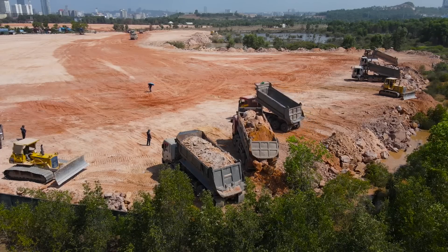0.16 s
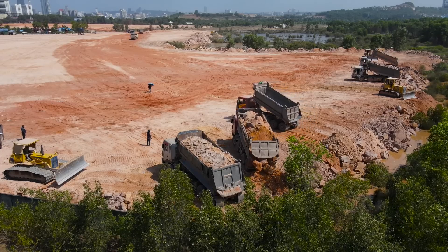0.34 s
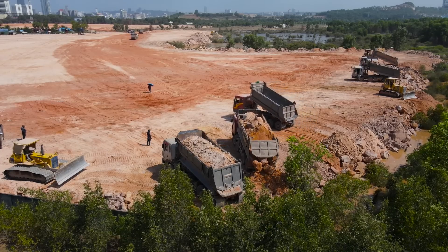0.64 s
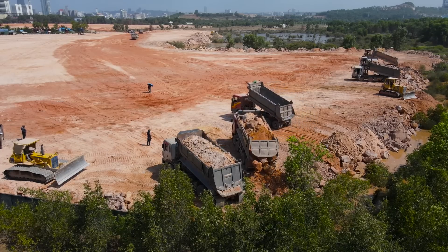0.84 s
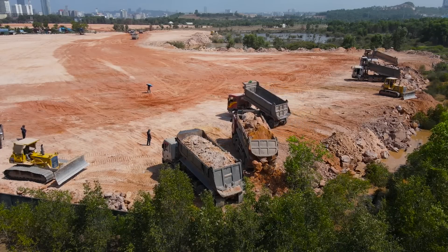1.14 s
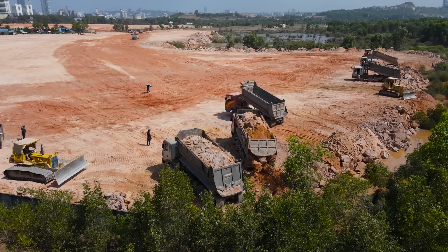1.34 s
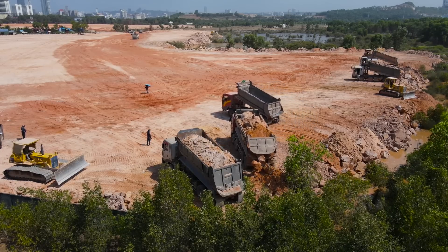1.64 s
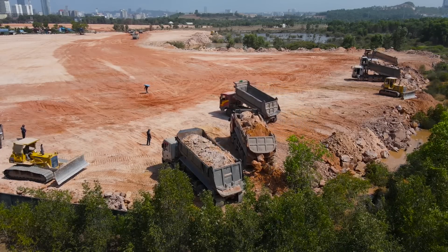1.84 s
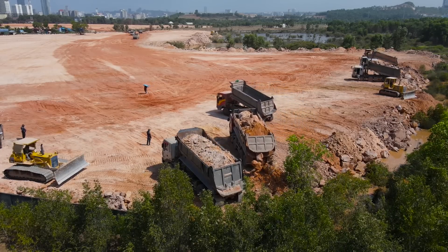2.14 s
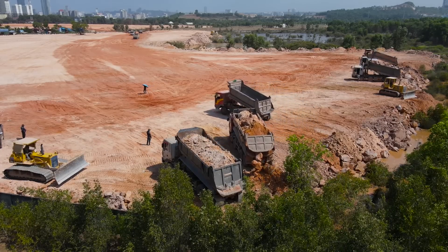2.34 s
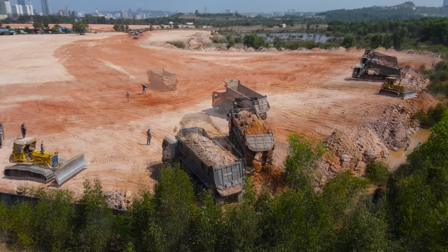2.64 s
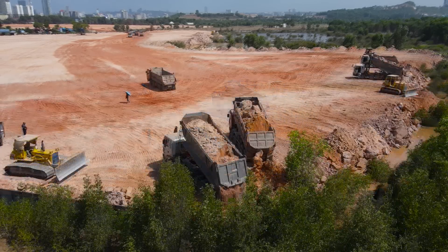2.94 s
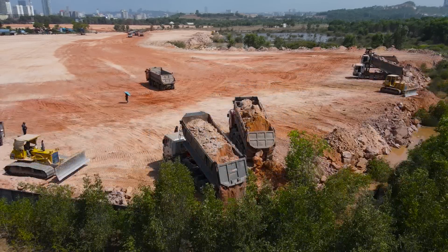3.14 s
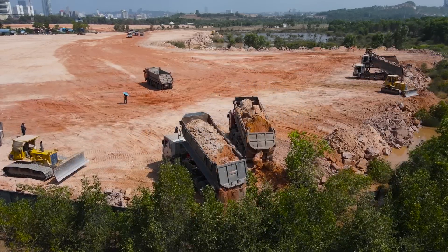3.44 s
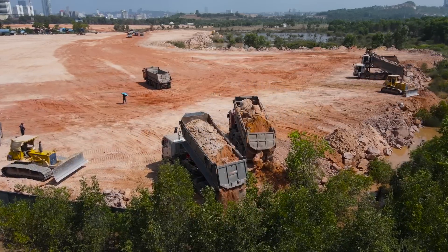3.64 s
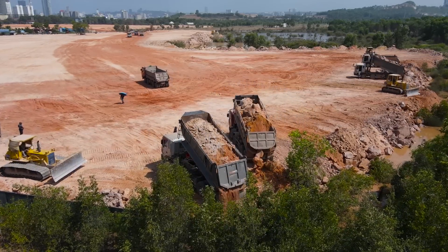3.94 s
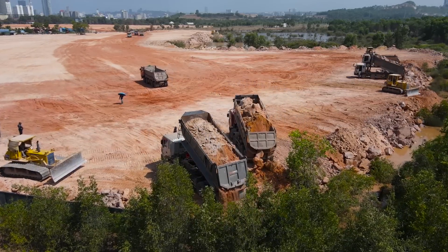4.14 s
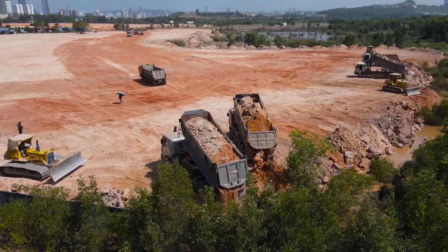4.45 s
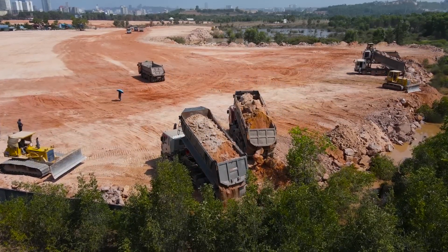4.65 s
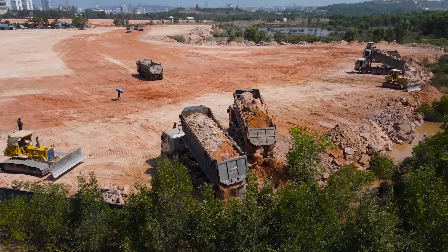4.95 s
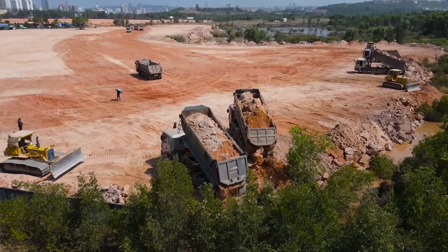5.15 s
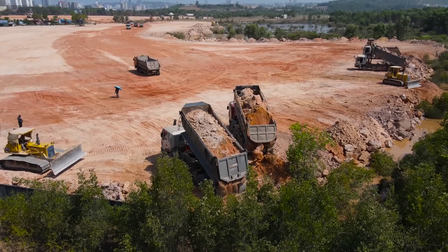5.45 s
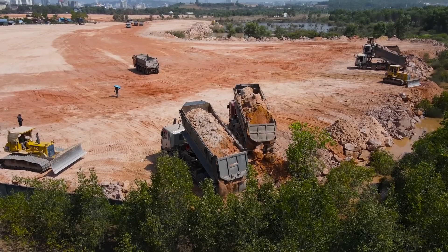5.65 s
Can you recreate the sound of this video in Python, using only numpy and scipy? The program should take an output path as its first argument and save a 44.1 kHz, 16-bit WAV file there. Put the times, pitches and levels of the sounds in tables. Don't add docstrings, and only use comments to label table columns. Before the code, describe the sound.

Low engine rumble under booming rock crashes on a steel truck bed, a short gravel slide, stone clacks and faint hinge squeaks.

```python
import sys
import numpy as np
from scipy import signal
from scipy.fft import rfft, irfft, next_fast_len
from scipy.io import wavfile
from scipy.ndimage import uniform_filter1d, map_coordinates

SR = 44100
rng = np.random.default_rng(int(sys.argv[2]) if len(sys.argv) > 2 else 0)


def dump_mix(stems):
    frames = np.atleast_2d(stems).T
    limited = np.clip(frames, -1, 1)
    pcm = np.round(limited * 32767).astype(np.int16)
    wavfile.write(sys.argv[1], SR, pcm)


def rack_gain(trim_db):
    fader = np.asarray(trim_db, float)
    return 10 ** (fader / 20)


N = 255339

# frequency in Hz, level in dB per Hz.
RUMBLE_COLOUR = [(20, -20), (40, -11.5), (55, 1), (75, -0.5), (105, -1), (130, -6), (170, -4.5), (230, -13),
                 (270, -19.5), (400, -46)]
# frequency in Hz, level in dB per Hz.
ROAR_COLOUR = [(150, -12), (260, -3.5), (310, -4.5), (360, -4.5), (414, -1.5), (493, -5.5), (567, -3),
               (645, -6.5), (668, -3), (1020, -6.5), (2090, -12), (4200, -30.5), (5460, -38), (9240, -120)]
# frequency in Hz, level in dB per Hz.
HISS_COLOUR = [(1800, -38), (3000, -4.5), (4200, -2), (5500, -3), (7000, -7.5), (8500, -2.5), (10000, -3.5),
               (11600, -2)]
# frequency in Hz, level in dB per Hz.
GRAVEL_COLOUR = [(180, -22), (300, -12.5), (472, -7), (663, -0.5), (743, -5), (942, -2.5), (1250, -12),
                 (2180, -9.5), (2670, -11.5), (4500, -25.5), (5850, -54), (9900, -120)]
# frequency in Hz, level in dB per Hz.
BED_COLOUR = [(90, -16.5), (160, -1.5), (350, -5), (480, -6.5), (640, -4), (900, -21.5), (1500, -17.5),
              (2600, -21.5), (4200, -26), (5500, -36), (9000, -32), (11600, -35.5)]

# frequency in Hz, phase in radians by which left leads.
ENGINE_LEAD = [(20, -.02), (70, -.05), (150, -.18), (350, -.6), (700, -1.7), (1030, -2.4), (1600, -3.2),
               (2500, -4.7), (4400, -5.8), (6000, -6.1), (12000, -6.2)]
# frequency in Hz, left-right likeness from 0 to 1.
FAR_LIKENESS = [(70, .997), (150, .98), (300, .87), (1000, .7), (1700, .6), (2400, .4), (3800, .55),
                (5000, .65), (7500, .5), (11000, .3)]
# frequency in Hz, left-right likeness from 0 to 1.
BED_LIKENESS = [(100, .999), (300, 0.91), (1500, 0.76), (3500, 0.32), (6500, 0.51), (9000, 0.31),
                (11000, 0.089)]

# multiple of the cycle rate, level in dB, drift in dB per s.
IDLE_ORDERS = [(11.05, -58, -2.5), (12, -34.5, 1.1), (13.05, -49.5, 1.5), (13.96, -45, 1), (15.7, -46, 0),
               (17.88, -37.5, -1), (18.87, -46, 2.5), (19.94, -42.5, 1), (21.33, -60.5, -1.5),
               (20.9, -65, -0.5), (30, -49.5, 1.5), (32.55, -62.5, 1.5), (41.9, -55.5, 0),
               (82.4, -59.5, 0.5)]
# time in seconds, firing rate in Hz, level in dB.
HOIST_REVS = [
    (0, 22.28, -41),
    (1.3, 23, -51),
    (2.2, 24, -43),
    (3.0, 26.6, -53.5),
    (4.4, 26.63, -56),
    (5.79, 26.55, -44),
]
# time in seconds, roar level in dB.
ENGINE_EFFORT = [(0, -32.5), (.25, -35), (.8, -38), (1.5, -39.5), (1.9, -38), (2.3, -38.5), (3.4, -39.5),
                 (4.5, -38), (5.2, -38), (5.79, -37)]
# time in seconds, hiss level in dB.
TRICKLE_LEVEL = [(0, -45), (.6, -50), (.92, -54.5), (1.3, -51), (1.87, -49.5), (2.5, -52.5), (2.95, -54),
                 (3.4, -50.5), (4.2, -49), (4.7, -47), (5.13, -51), (5.79, -49.5)]

# start in seconds, length in seconds, pitch in Hz, level in dB.
HINGE_SQUEAKS = [
    (.40, 0.0081, 5270, -50),
    (0.523, 0.031, 5300, -53),
    (3.262, 0.066, 4070, -60),
    (3.259, 0.095, 8000, -60),
    (3.881, 0.066, 5670, -63),
    (3.942, 0.042, 6440, -67),
    (4.126, 0.14, 6200, -57.5),
    (4.257, 0.057, 5730, -60),
    (4.426, 0.21, 4120, -59),
    (4.48, .08, 5520, -61),
]
# start in seconds, level in dB, centre in Hz.
STONE_CLACKS = [(0.069, -29, 487), (0.125, -19.5, 740), (0.157, -15.5, 470), (0.251, -19, 408),
                (0.348, -29, 1090), (0.414, -20.5, 500), (0.481, -29, 550), (0.549, -26, 570),
                (0.639, -29, 1160), (0.79, -21, 495), (0.949, -22, 800), (2.649, -18.5, 458),
                (2.689, -19, 404), (2.879, -28.5, 716), (2.999, -20.5, 672), (4.118, -26, 409),
                (4.498, -25, 402), (4.718, -24.5, 664)]
# start in seconds, level in dB, centre in Hz.
STONE_TICKS = [(0.151, -25, 4170), (0.289, -40, 3570), (0.308, -39, 3910), (0.475, -25, 3600),
               (0.569, -38, 5700), (0.6906, -35, 8890), (0.767, -29, 4760), (0.79, -36, 4560),
               (1.8282, -35, 3300), (2.962, -41, 3050), (3.752, -34.5, 5300), (4.115, -24, 4080),
               (4.451, -42, 4140), (4.594, -24.5, 4300), (5.2633, -37, 3340)]
# start in seconds, level in dB, centre in Hz, t60 in seconds, width in octaves.
WALL_RAPS = [(0.211, -24.5, 9200, .04, 0.28), (.708, -29, 1770, 0.3, 0.4), (2.640, -25, 2140, 0.14, 0.38),
             (2.965, -38, 1900, 0.23, 0.99), (3.575, -25.5, 6800, 0.049, 1.1),
             (4.760, -22.5, 1660, 0.25, 0.61), (4.795, -24.5, 3100, 0.24, 0.18),
             (4.825, -24, 2860, 0.29, 0.35), (.156, -15.5, 333, 0.22, 0.79), (.46, -29, 1310, 0.35, 0.76),
             (1.058, -13.5, 590, 0.4, 0.29), (1.19, -24, 467, 0.72, 0.55), (2.962, -21, 450, 0.68, 0.94),
             (4.793, -11, 800, 0.26, 0.89), (4.815, -24, 650, 0.38, 0.56)]
# start in seconds, rise in seconds, run in seconds, level in dB, sag in dB per s.
GRAVEL_SURGES = [
    (0.944, 0.052, .05, -20.5, 18),
    (1.05, 0.0047, 0.12, -15.5, 93),
]
# start in seconds, level in dB, tilt in dB per octave, t60 in seconds at 1 kHz,
# hold in seconds.
BOULDER_CRASHES = [
    (0.15, -18.5, 0.5, 0.55, 0.017),
    (1.054, -9.5, 3.5, 0.62, 0.008),
    (2.635, -24.5, 2, 0.36, 0.049),
    (2.959, -15.5, 1.35, 0.71, 0.035),
    (4.790, -10, -0.24, 0.44, 0.041),
]
# start in seconds, level in dB, pitch in Hz, t60 in seconds.
PANEL_THUDS = [(0.163, -7.5, 83.8, 0.16), (0.219, -35, 91.5, 0.15), (0.375, -18, 90.2, 0.43),
               (0.428, -19, 70.0, 0.15), (0.719, -17, 92.2, 0.3), (0.76, -19, 80.7, 0.092),
               (1.067, -6.5, 144.8, 0.35), (1.13, -4.5, 113.6, 0.24), (1.187, -19, 97.6, 0.14),
               (1.301, -10, 95, 0.33), (1.348, -10.5, 90.5, 0.098), (2.669, -8.5, 75, 0.13),
               (2.971, -16, 108.6, 0.24), (2.992, -13.5, 165, 0.2), (3.039, -17, 129.1, 0.43),
               (3.19, -18.5, 61.2, 0.4), (4.81, -13, 165.4, 0.29), (4.831, -14.5, 197, 0.26),
               (4.885, -12, 111.3, 0.14)]

# frequency in Hz, gain in dB.
SUM_TREBLE = [(9550, 0), (9750, -45), (10550, -45), (10750, -1.2), (11550, -1.2), (11700, -90)]
# frequency in Hz, gain in
# dB.
DIFFERENCE_TREBLE = [(8150, 0), (8350, -40), (8950, -40), (9100, 4.5), (11150, 1), (11400, -90)]
# frequency in Hz, threshold in dB.
SUM_FLOOR = [(900, -30), (1250, -8), (2000, -6.5), (2600, -20), (6000, -20), (6500, 2), (7100, 2),
             (7600, -20), (10400, -30), (10600, 2.4), (12000, 2.4)]
# frequency in Hz, threshold in dB.
DIFFERENCE_FLOOR = [(2500, -30), (3800, -6), (5000, -5.5), (6200, -4.8), (7500, -4.6), (8200, -2),
                    (9000, -30)]

CYCLE_HZ = 5.148
RUMBLE_DB, RUMBLE_FOLLOWS = -33, 0.22
ROAR_WOBBLE_DB = 0.5
SQUEAK_DRIFT = 0.004
CLACK_T60_S, CLACK_OCTAVES = 0.14, 0.91
TICK_T60_S, TICK_OCTAVES = 0.086, 0.7
RISE_DB, STOP_DB_PER_S, GRIT_DB = 28, 400, -6.5
AFTER_DB, AFTER_T60_S, AFTER_RISE_S, ECHO_DB = -10.5, 1.11, 0.022, -18.5


def unit(x):
    return x / np.sqrt(np.mean(x ** 2) + 1e-20)


def along(points, hz):
    f, v = np.transpose(points)
    return np.interp(np.log(hz + 1), np.log(f + 1), v)


def colour(spectrum):
    return lambda hz: rack_gain(along(spectrum, hz))


def curves(rows):
    s, *columns = np.transpose(rows)
    return [np.interp(np.arange(N) / SR, s, column) for column in columns]


def wobble(rate, size=N):
    coarse = np.arange(0, size + 64, 64)
    knots = rng.standard_normal(int(size * rate / SR) + 4)
    return np.interp(np.arange(size), coarse, map_coordinates(knots, [coarse * rate / SR]))


def filtered(x, response):
    m = next_fast_len(x.shape[-1] + 4096)
    spectrum = rfft(x, m) * response(np.fft.rfftfreq(m, 1 / SR))
    return irfft(spectrum, m)[..., :x.shape[-1]]


def pair(size, gain, alike, lead=0, patchy_db=0):
    z = signal.stft(rng.standard_normal((3, size + 512)), nperseg=512)[2]
    patches = uniform_filter1d(rng.standard_normal(z.shape[1:]), size=5, axis=0)
    patches = uniform_filter1d(patches, size=10, axis=1)
    noise = signal.istft(z * rack_gain(patchy_db * unit(patches)), nperseg=512)[1][:, :size]
    shared, left, right = noise
    share = lambda hz: np.clip(along(alike, hz), 0, 1)
    turn = lambda hz: np.exp(.5j * lead * along(ENGINE_LEAD, hz) * [[1], [-1]])
    direct = filtered(shared, lambda hz: gain(hz) * np.sqrt(share(hz)) * turn(hz))
    diffuse = filtered(np.array([left, right]), lambda hz: gain(hz) * np.sqrt(1 - share(hz)))
    return unit(direct + diffuse)


def grains(size, per_s, depth):
    spikes = (rng.random(size) < per_s / SR) * rng.exponential(size=size)
    return unit(1 + depth * signal.lfilter([1], [1, -np.exp(-1 / (0.0035 * SR))], spikes))


def add(track, s, sound):
    part = track[:, round(s * SR):][:, :sound.shape[-1]]
    part += sound[..., :part.shape[-1]]


def engines():
    t = np.arange(N) / SR
    turn = 2 * np.pi * CYCLE_HZ * t

    def line(k, phase):
        swell = np.sqrt(2) * rack_gain(0.85 * wobble(4.97))
        return swell * np.sin(k * phase + 0.27 * wobble(3.15) + k * k)

    tones = sum(rack_gain(db + drift_db * (t - t.mean())) * line(k, turn) for k, db, drift_db in IDLE_ORDERS)
    firing_hz, hoist_db = curves(HOIST_REVS)
    revs = 2 * np.pi * np.cumsum(firing_hz) / SR
    tones += rack_gain(hoist_db) * (line(2.2, revs) + rack_gain(2.0) * line(2.5, revs))

    roar_db, = curves(ENGINE_EFFORT)
    rumble_db = RUMBLE_DB + RUMBLE_FOLLOWS * (roar_db - roar_db.mean()) + 0.62 * wobble(11)
    rumble = rack_gain(rumble_db) * pair(N, colour(RUMBLE_COLOUR), FAR_LIKENESS, lead=0.96, patchy_db=2.0)
    beat = 1 + 0.051 * np.sin(18 * turn)
    roar_level = rack_gain(roar_db + 2.5 + ROAR_WOBBLE_DB * wobble(6.1)) * beat
    roar = roar_level * pair(N, colour(ROAR_COLOUR), FAR_LIKENESS, lead=0.95, patchy_db=1.72)
    return tones + rumble + roar


def trickle():
    hiss_db, = curves(TRICKLE_LEVEL)
    level = rack_gain(hiss_db + 5.0 + 1.45 * wobble(6)) * grains(N, 170, 0.081)
    return level * pair(N, colour(HISS_COLOUR), FAR_LIKENESS, lead=0.93, patchy_db=1.6)


def squeaks():
    out = np.zeros((2, N))
    for s, length, hz, db in HINGE_SQUEAKS:
        size = round(length * SR)
        drift = 1 + SQUEAK_DRIFT * wobble(39.0, size)
        level = rack_gain(db + 4.5 + 4.4 * wobble(44, size)) * signal.windows.tukey(size, .5)
        add(out, s, level * np.sin(2 * np.pi * np.cumsum(hz * drift) / SR))
    return out


def stones():
    out = np.zeros((2, N))
    clacks = [(*row, CLACK_T60_S, CLACK_OCTAVES) for row in STONE_CLACKS]
    ticks = [(*row, TICK_T60_S, TICK_OCTAVES) for row in STONE_TICKS]
    for s, db, hz, t60, octaves in clacks + ticks + WALL_RAPS:
        size = round(SR * min(.2, t60 / 2 + .03))
        t = np.arange(size) / SR
        hump = lambda f: np.exp(-.5 * (np.log2((f + 1) / hz) / octaves) ** 2)
        level = rack_gain(db - 6.0 - 60 * t / t60) * (1 - np.exp(-t / 0.0031))
        add(out, s, level * pair(size, hump, BED_LIKENESS, patchy_db=2.0))
    return out * rack_gain([[1.2], [-1.2]])


def slide():
    out, size = np.zeros((2, N)), SR // 3
    t = np.arange(size) / SR
    for s, rise, run, db, sag_db in GRAVEL_SURGES:
        flow_db = db - RISE_DB * np.maximum(1 - t / rise, 0)
        flow_db = flow_db - sag_db * np.maximum(t - rise, 0)
        flow_db = flow_db - STOP_DB_PER_S * np.maximum(t - rise - run, 0)
        body = grains(size, 267, 0.18) * pair(size, colour(GRAVEL_COLOUR), BED_LIKENESS, patchy_db=2.5)
        grit = grains(size, 570, 0.23) * pair(size, colour(HISS_COLOUR), BED_LIKENESS, patchy_db=3.5)
        add(out, s, rack_gain(flow_db) * (body + rack_gain(GRIT_DB) * grit))
    return out


def crashes():
    out, size = np.zeros((2, N)), SR // 2
    t = np.arange(size) / SR
    after_colour = lambda f: rack_gain(along(RUMBLE_COLOUR, f)) + rack_gain(ECHO_DB + along(ROAR_COLOUR, f))
    for s, db, tilt_db, t60, hold in BOULDER_CRASHES:
        bed = lambda f: rack_gain(along(BED_COLOUR, f) + tilt_db * np.log2((f + 50) / 1000))
        shake = pair(size, bed, BED_LIKENESS, patchy_db=1.5)
        hz, frame, z = signal.stft(grains(size, 220, 0.079) * shake, SR, nperseg=256)
        life = t60 * ((hz[:, None] + 100) / 1000) ** -.2
        decay = rack_gain(-60 * np.maximum(frame - hold, 0) / life)
        dying = signal.istft(z * decay, SR, nperseg=256)[1][:, :size]
        blow = (1 - np.exp(-t / 0.0013)) * (1 + 1.1 * np.exp(-t / 0.0098))
        add(out, s, rack_gain(db - 12.5) * blow * dying)

        after = pair(size, after_colour, FAR_LIKENESS, patchy_db=3.0) * np.cos(np.pi * t) ** .5
        after_level = rack_gain(db + AFTER_DB - 60 * t / AFTER_T60_S) * (1 - np.exp(-t / AFTER_RISE_S))
        add(out, s, after_level * after)
    return out


def thuds():
    out, size = np.zeros((2, N)), SR // 2
    t = np.arange(size) / SR
    for s, db, hz, t60 in PANEL_THUDS:
        ratio, phase = rng.random((2, 3, 1))
        upper = np.sin(2 * np.pi * (hz * (1.2 + 1.1 * ratio) * t + phase)).sum(axis=0)
        panel = np.sin(2 * np.pi * hz * t) + 0.23 * upper
        add(out, s, rack_gain(db - 4.5 - 60 * t / t60) * (1 - np.exp(-t / 0.0025)) * panel)
    return out


def scene():
    return engines() + trickle() + squeaks() + stones() + slide() + crashes() + thuds()


def dropouts(mid, side):
    hz, _, z = signal.stft(np.array([mid, side]), SR, nperseg=2048)
    hz = hz[:1024]
    power = (np.abs(z[:, :1024]) ** 2).reshape(2, 128, 8, -1).mean(axis=2)
    power = uniform_filter1d(power, size=2, axis=2)
    lead_db = 10 * np.log10((power[0] + 1e-20) / (power[1] + 1e-20))
    lead_db = np.repeat(lead_db, 8, axis=0)
    keep_mid = lead_db > along(SUM_FLOOR, hz)[:, None]
    keep_side = -lead_db > along(DIFFERENCE_FLOOR, hz)[:, None]
    kept = np.concatenate([z[:, :1024] * [keep_mid, keep_side], z[:, 1024:]], axis=1)
    return signal.istft(kept, SR, nperseg=2048)[1][:, :N]


def low_pass(x):
    return signal.sosfilt(signal.butter(12, 11710, fs=SR, output="sos"), x)


def record(dry):
    dry = dry / (1 + np.abs(dry / .75) ** 4) ** (1 / 4)
    mid = filtered((dry[0] + dry[1]) / 2, colour(SUM_TREBLE))
    mid, side = dropouts(mid, (dry[0] - dry[1]) / 2)
    side = filtered(side, colour(DIFFERENCE_TREBLE))
    return low_pass(np.array([mid + side, mid - side]))


dry = scene()
out = record(dry)
dump_mix(out)
```